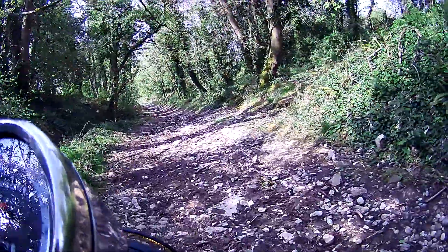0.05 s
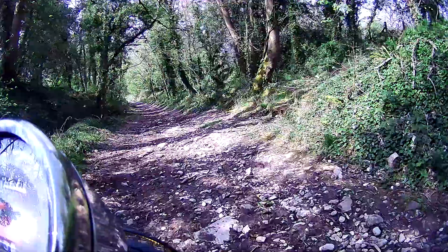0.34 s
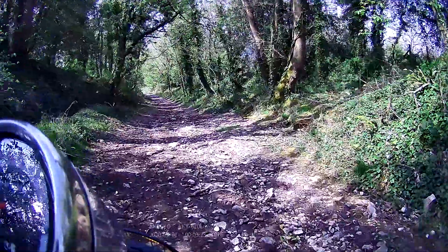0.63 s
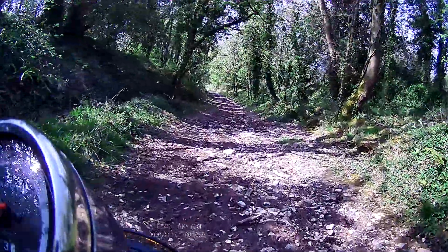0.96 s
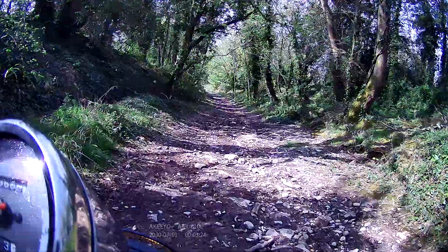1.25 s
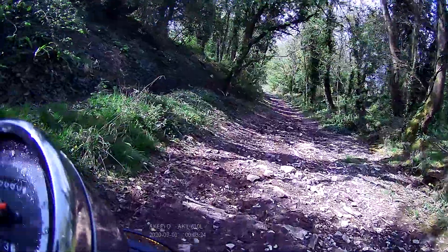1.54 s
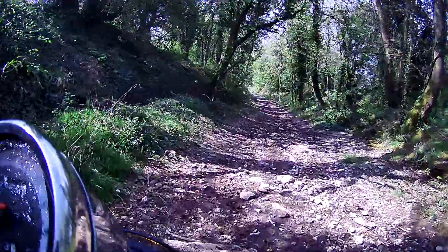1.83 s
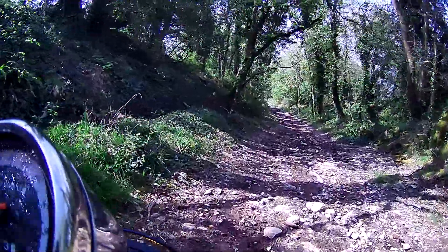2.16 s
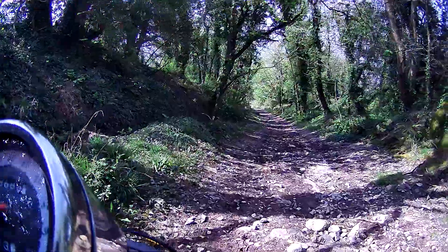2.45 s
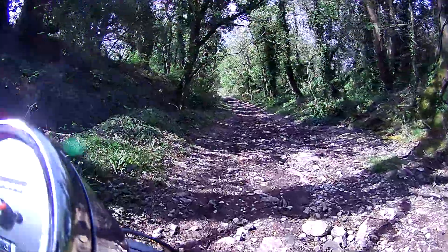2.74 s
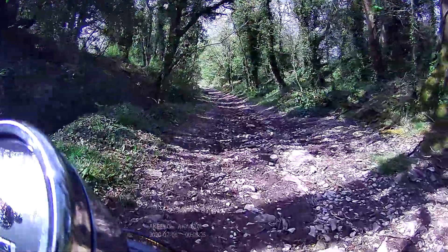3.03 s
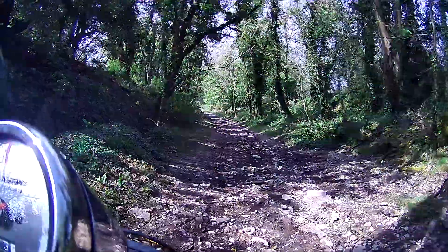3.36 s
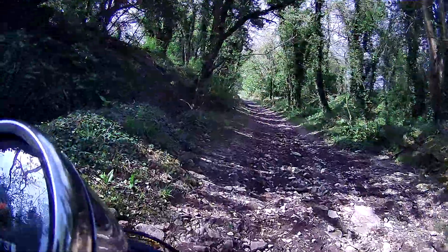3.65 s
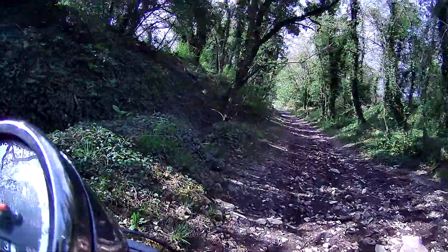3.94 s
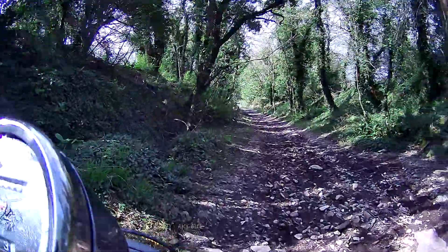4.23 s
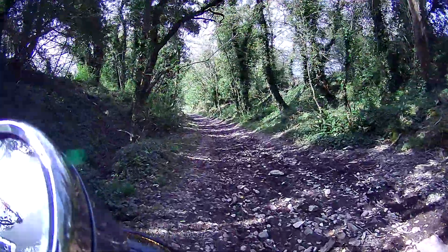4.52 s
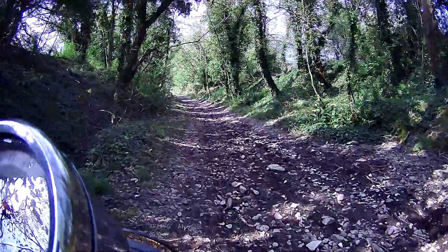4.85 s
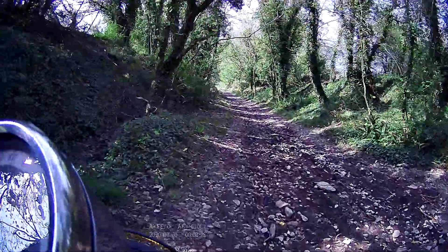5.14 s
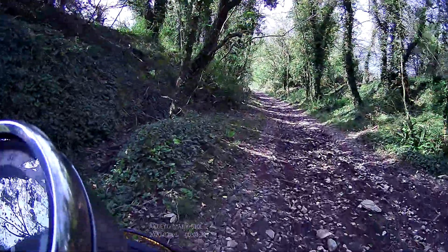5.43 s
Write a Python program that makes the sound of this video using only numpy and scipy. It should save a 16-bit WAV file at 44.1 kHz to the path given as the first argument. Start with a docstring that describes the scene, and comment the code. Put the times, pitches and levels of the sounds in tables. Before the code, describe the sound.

A single-cylinder motorcycle plods along a stony lane, heard close from the handlebars for nearly six seconds. Throughout, the exhaust thumps at low revs, with engine knocks, ticking valves and a mechanical whirr. Gravel crunches, stones snap brightly under the tyres, and hard knocks and loose metal clank irregularly.

The revs dip just after the start, then climb unevenly through six throttle pulls, at about 0.8, 1.5, 2.4, 3.2, 4.2 and 5.5 seconds. Each adds a rough, honking intake drone for roughly half a second or a little more, and the later ones are louder. Rocky ground around 2.9 seconds brings a cluster of stone cracks and clanks; a rougher patch around 3.7 seconds adds thicker clicks and a low rumble. The hardest clank lands with a sharp stone snap at 4.7 seconds. The loudest peaks briefly overload the microphone.

```python
"""A stony lane, from a camera microphone on the handlebars of a plodding single-cylinder motorcycle.
From the start, close by, each cycle thumps the exhaust, knocks the engine and ticks the valves; stones
snap under the tyres, and hard engine knocks and loose metal clank. From 0.8 s six pulls of the throttle
set the intake honking and the low revs climb unevenly. Rocky ground passes at 2.9 s and 3.7 s; the
hardest clank comes at 4.7 s. The loudest peaks overload the microphone."""
import sys
import numpy as np
from scipy import signal
from scipy.fft import rfft, irfft, next_fast_len
from scipy.io import wavfile
from scipy.ndimage import map_coordinates

SR = 44100
rng = np.random.default_rng(int(sys.argv[2]) if len(sys.argv) > 2 else 0)


def bounce(signal):
    """Save signal as a 16-bit WAV file at the path given by the first command-line argument."""
    frames = np.transpose(np.atleast_2d(signal))
    limited = np.clip(frames, -1, 1)
    pcm = np.round(limited * 32767).astype(np.int16)
    wavfile.write(sys.argv[1], SR, pcm)


N = 250929
TIME = np.arange(N) / SR

# blows within one engine cycle: (position [cycles], relative thud [dB], relative tick [dB])
CYCLE_BLOWS = [(.05, 1.5, -4), (.15, 0.5, -4.5), (.28, 1.5, -9.5), (0.381, -5, -2.5), (0.457, -27.5, -5),
               (0.588, 0, -1), (.715, 7, -29), (.83, -2, -25.5)]
# spectrum of crunching grit: (frequency [Hz], level [dB])
GRIT_SPECTRUM = [(1200, -11.5), (1800, -7.5), (2600, 5), (3100, 14.5), (3650, -15.5), (4300, 7),
                 (4750, -12), (5100, 3), (5700, -18), (6400, 0.5), (7200, -18), (8000, -21), (9000, -32)]
# resonance of struck metal: (frequency [Hz], width [Hz], gain [dB])
CLANK_MODE = [(1365, 150, 0)]


def amp(db):
    """Decibels to gain."""
    return 10 ** (np.asarray(db) / 20)


def unit(x):
    """Scale to rms 1."""
    return x / np.sqrt(np.mean(x ** 2) + 1e-20)


def bell(x, width):
    """A smooth hump of height 1 around x = 0."""
    return np.exp(-.5 * (x / width) ** 2)


def wobble(rate):
    """A smooth random curve, rate knots a second."""
    return map_coordinates(rng.standard_normal(int(N * rate / SR) + 4), [TIME * rate])


def filtered(x, response):
    """x times a complex response of frequency."""
    m = next_fast_len(N + SR // 2)
    return irfft(rfft(x, m) * response(np.fft.rfftfreq(m, 1 / SR)), m)[:N]


def coloured(x, points):
    """x through a spectrum of (frequency [Hz], level [dB]) points, at rms 1."""
    hz, db = np.transpose(points)
    return unit(filtered(x, lambda f: amp(np.interp(np.log(f + 1), np.log(hz), db))))


def ring(x, modes):
    """x through the resonances of a body."""
    return filtered(x, lambda f: sum(amp(db) * 1j * f * width / (hz * hz - f * f + 1j * f * width)
                                     for hz, width, db in modes))


def blows(cycles, position, scatter_db, jitter_s):
    """One impulse per engine cycle at the given position in it, uneven in size and time."""
    due = np.arange(-1, int(cycles[-1]) + 2) + position
    lateness, size = rng.standard_normal((len(due), 2)).T
    times = np.interp(due, cycles, TIME, -1, -1) + jitter_s * lateness
    at = np.round(times * SR).astype(int)
    heard = (at >= 0) & (at < N)
    return np.bincount(at[heard], amp(scatter_db * size[heard]), N)


def bursts(hits, t60_s):
    """Each impulse becomes a dying burst of noise."""
    return signal.lfilter([1], [1, -amp(-60 / (t60_s * SR))], hits) * rng.standard_normal(N)


def lane(load, roughness):
    """Fine gravel crunches under the tyres, more under load; rocky ground rumbles at the microphone."""
    # ground rumble: (frequency [Hz], level [dB])
    rumble_spectrum = [(8, -0.5), (22, 8.5), (40, -6.5), (80, -8), (200, -8), (400, -15), (900, -57.5)]
    grains_per_s = 300
    grains = (rng.random(N) < grains_per_s / SR) * amp(2.5 * rng.exponential(size=N).clip(0, 3))
    crunch = unit(bursts(grains, t60_s=.02)) + rng.standard_normal(N)
    gravel = (amp(-53.5) + amp(-24.5) * load) * coloured(crunch, GRIT_SPECTRUM)
    rumble = coloured(rng.standard_normal(N), rumble_spectrum)
    return gravel + amp(-28.5 + 7.5 * roughness + 1.3 * wobble(4.3)) * rumble


def stones(roughness):
    """Stones snap brightly under the tyres; pebbles come thicker and harder on rocky ground."""
    # the larger stones: (time [s], relative level [dB], pitch [Hz])
    large_stones = [(.1565, -13.5, 6860), (.1808, -20, 2480), (.2822, -7, 3700), (.7248, -19.5, 5500),
                    (.837, -6.5, 3280), (.8945, -11.5, 2000), (1.0152, -12.5, 5150), (1.291, -11.5, 6200),
                    (1.6169, -9, 4030), (2.0526, -15.5, 3450), (2.188, -19.5, 5030), (2.3535, -7, 6140),
                    (2.812, -5.5, 3190), (2.827, -1, 2500), (2.8664, -1.5, 2600), (2.9626, -8, 5960),
                    (2.977, -4, 4000), (3.19, -14.5, 3320), (3.481, -4.5, 2500), (3.504, -11, 4900),
                    (3.5339, -6, 3200), (3.6514, -6, 3000), (3.685, -8, 3000), (3.7513, -4, 2700),
                    (3.761, -10.5, 4370), (3.7666, 3.5, 4370), (4.097, -21.5, 4500), (4.7019, 4, 2200),
                    (4.7808, -16, 3940), (4.9561, -3.5, 3000), (5.6642, -9, 5000)]
    pebbles_per_s = 6.4 + 35 * roughness
    at = np.flatnonzero(rng.random(N) < pebbles_per_s / SR)
    size, pitch = rng.standard_normal((len(at), 2)).T
    pebbles = zip(at / SR, -28.5 + 10 * roughness[at] + 2 * size, 4200 * np.exp(.3 * pitch))
    t = np.arange(SR // 16) / SR
    f = np.fft.rfftfreq(len(t), 1 / SR)
    rise_s, t60_s = .0014, .019
    snap = amp(5 - 60 * t / t60_s) * (1 - np.exp(-(t / rise_s) ** 2))
    band = f ** 2 / (f ** 2 + 1300 ** 2) / (1 + (f / 9000) ** 8)
    peak = lambda hz, width_hz: 1 / (1 + ((f - hz) / width_hz) ** 2)
    clicks = np.zeros(N + SR)
    for start_s, db, hz in [*large_stones, *pebbles]:
        colour = (.96 + peak(hz, 600) + .25 * peak(5500, 390)) * band
        grit = unit(irfft(rfft(rng.standard_normal(len(t))) * colour, len(t)))
        clicks[round(start_s * SR):][:len(t)] += amp(db) * snap * grit
    return clicks[:N]


def metal_clanks():
    """Struck metal: a ring that takes a few periods to build, under a short bright clatter."""
    # hard engine knocks, mostly at low revs, and loose metal jolted by bumps:
    # (time [s], relative level [dB])
    clanks = [(0.0456, -11.5), (0.1806, -3), (0.2829, -2), (0.381, -6.5), (0.685, -7.5), (0.8968, -6),
              (1.445, -8.5), (1.52, -4.5), (1.6189, -8), (2.0526, -11), (2.827, -1.5), (2.866, -0.5),
              (2.996, -4.5), (3.165, -8), (3.481, 2.5), (3.5738, -6), (3.7229, -3), (4.7017, 6),
              (4.9569, -4), (5.438, -5.5)]
    times, db = np.transpose(clanks)
    hits = np.bincount(np.round(times * SR).astype(int), amp(db), N)
    ringing = ring(ring(hits, CLANK_MODE), CLANK_MODE)
    clatter = ring(bursts(hits, t60_s=.061), [(2160, 880, 13)])
    return amp(1.5 + db.max()) * ringing / np.abs(ringing).max() + amp(-14.5) * clatter


def valves(cycles):
    """Tappets tick at set points of the cycle; the running chain keeps the same metal ringing."""
    # valve gear resonances: (frequency [Hz], width [Hz], gain [dB])
    valve_modes = [(3170, 260, -1.5), (3047, 260, 7), (4400, 110, -12.5), (5160, 260, -7.5),
                   (6360, 580, 1.5)]
    spectrum = [(1500, -16.5), (2800, 6.5), (3300, 9), (3650, -8), (4200, 11.5), (6600, -8), (8000, -15)]
    taps = sum(amp(tick_db) * blows(cycles, position, scatter_db=1.5, jitter_s=.0003)
               for position, _, tick_db in CYCLE_BLOWS)
    chain = .53 * rng.standard_normal(N)
    ticks = unit(bursts(taps, t60_s=.017))
    return amp(-33) * coloured(ring(ticks + chain, valve_modes), spectrum)


def knock(cycles, load):
    """Combustion strikes and rattles the engine metal once a cycle; it sings faintly in between."""
    # engine metal resonances: (frequency [Hz], width [Hz], gain [dB])
    engine_modes = [(1337, 91, 11), (1290, 170, -8.5), (1750, 230, -23.5), (2470, 530, -17)]
    spectrum = [(900, -11), (1200, -5.5), (1290, 2), (1450, 3.5), (1600, -15), (2000, -3), (4000, -10)]
    hits = blows(cycles, .735, scatter_db=1.5, jitter_s=.0008)
    strike = unit(ring(ring(hits, CLANK_MODE), CLANK_MODE))
    swell = bell((cycles - .765 + .5) % 1 - .5, .048)  # peaks just after the strike
    rattle = swell * rng.standard_normal(N)
    singing = amp(-12) * rng.standard_normal(N)
    metal = coloured(ring(rattle + singing, engine_modes), spectrum)
    rasp = coloured(rattle, GRIT_SPECTRUM)
    level_db = -20.5 - 1.5 * load / load.max()  # eases under load
    return amp(level_db) * (.25 * strike + 1.017 * metal + amp(-20.5) * rasp)


def exhaust(cycles, revving):
    """Each firing is a soft push-pull of air, stronger at higher revs; the pipe adds a duller echo."""
    # exhaust pipe colour: (frequency [Hz], level [dB])
    pipe_spectrum = [(35, -5), (66, 2), (95, 1.5), (125, -2), (152, 6.5), (185, -11), (260, -13)]
    echo_s, low_cut_hz = .0165, 42
    firings = blows(cycles, .035, scatter_db=1, jitter_s=.0003)
    puff = lambda f, hz: -1j * f / hz * bell(f, hz)
    echo = lambda f: .78 * puff(f, hz=44) * np.exp(-2j * np.pi * f * echo_s)
    low_cut = lambda f: f ** 4 / (f ** 4 + low_cut_hz ** 4)
    thumps = filtered(firings, lambda f: (puff(f, hz=77) + echo(f)) * low_cut(f))
    return amp(-24.5 + .34 * revving) * coloured(thumps, pipe_spectrum)


def mount_shake(cycles, revving):
    """The engine's blows thud through the mount to the microphone, over the whirr of moving parts."""
    # camera mount resonances: (frequency [Hz], width [Hz], gain [dB])
    mount_modes = [(474, 23, 3), (516, 81, -5.5), (669, 66, -10), (1034, 82, -24.5)]
    # moving engine parts: (frequency [Hz], level [dB])
    whirr_spectrum = [(150, -19), (220, -16.5), (330, -7.5), (420, -5), (600, 6.5), (780, -1), (920, -6),
                      (1100, -7), (1220, -22), (1600, -30), (2500, -37), (4000, -40.5)]
    hits = sum(amp(thud_db) * blows(cycles, position, scatter_db=2, jitter_s=.00022)
               for position, thud_db, _ in CYCLE_BLOWS)
    softened = filtered(hits, lambda f: 1 / (1 + (f / 1150) ** 8) / (1 + (300 / (f + 1)) ** 4))
    thuds = unit(ring(softened, mount_modes))
    whirr = coloured(rng.standard_normal(N), whirr_spectrum) * amp(2.32 * wobble(70))
    return amp(.55 * revving) * (amp(-17.5) * thuds + amp(-15) * whirr)


def throttle():
    """Load (as the drone's gain) and its note: each pull starts as a low groan, swells, holds and dies."""
    # throttle pulls: (opens [s], closes [s], drone level [dB], pitch at cruising speed [Hz])
    pulls = [(0.848, 1.422, -15.5, 497), (1.545, 2.301, -21.5, 518), (2.37, 2.998, -12.3, 546),
             (3.238, 3.998, -8.8, 552), (4.219, 4.731, -9, 550.9), (5.548, 5.9, -7.5, 553.5)]
    swell_s, fade_s = .018, .022
    groan_lead_s, groan_width_s, groan_hz = .0702, .04, 465.2
    coast_db, coast_hz = -22, 504.4  # throttle shut
    parts = [(np.full(N, amp(coast_db)), coast_hz)]
    for opens, closes, db, hz in pulls:
        opening = (1 + np.tanh((TIME - opens) / (2 * swell_s))) / 2
        closing = (1 + np.tanh((closes - TIME) / (2 * fade_s))) / 2
        groan = bell(TIME - opens + groan_lead_s, groan_width_s)
        parts += [(amp(db) * opening * closing, hz), (amp(db - 9) * groan, groan_hz)]
    load = sum(gain for gain, _ in parts)
    note_hz = sum(gain ** 2 * hz for gain, hz in parts) / sum(gain ** 2 for gain, _ in parts)
    return load, note_hz


def intake_drone(cycles, revving, load, note_hz):
    """A rough honk that swells and rises as the throttle opens; each firing tugs its level and phase."""
    pitch_hz = note_hz + 9 * revving
    phase = 2 * np.pi * np.cumsum(pitch_hz) / SR
    waver = wobble(120) + 1j * wobble(120)
    sag = 1 - .5 * bell((cycles - .63 + .5) % 1 - .5, .06)
    tug = .6 * np.sin(2 * np.pi * cycles) + .35 * np.sin(4 * np.pi * cycles)
    jitter = .3 * wobble(60) + .31 * wobble(300)
    tone = np.real((1 + .64 * waver) * np.exp(1j * (phase + tug + jitter)))
    return load * unit(sag * tone)


def scene():
    """At the handlebars, in mono: the engine follows revs and throttle, the tyres follow the ground."""
    # engine speed: (time [s], firing rate [Hz])
    engine_speed = [(0, 13.53), (.26, 11.47), (.8, 14.2), (1.19, 15.14), (1.48, 13.6), (1.68, 14.75),
                    (2.21, 15.34), (2.5, 17.04), (2.76, 16.82), (3.11, 15.71), (3.4, 17.8), (3.88, 17.45),
                    (4.17, 16.08), (4.38, 18.08), (4.8, 16.32), (5.34, 16.24), (5.69, 18.06)]
    # rocky stretches: (middle [s], half length [s], roughness [relative])
    rocky_stretches = [(2.896, 0.16, 0.3), (3.666, 0.11, 1.1)]
    firing_hz = np.interp(TIME, *np.transpose(engine_speed))
    cycles = .122 + np.cumsum(firing_hz) / SR
    revving = firing_hz - 16  # firings a second above cruising speed
    load, note_hz = throttle()
    roughness = sum(height * bell(TIME - middle, half) for middle, half, height in rocky_stretches)
    engine = mount_shake(cycles, revving) + intake_drone(cycles, revving, load, note_hz)
    engine += exhaust(cycles, revving) + knock(cycles, load) + valves(cycles)
    return (lane(load, roughness) + metal_clanks() + stones(roughness) + engine)[None]


def record(dry):
    """The microphone overloads and is dulled; sharp peaks clip again before the camera's band limit."""
    ceiling, hardness, band_limit_hz = .57, 9, 15800
    overloaded = dry[0] / (1 + np.abs(dry[0] / ceiling) ** hardness) ** (1 / hardness)
    treble_loss = lambda f: 1 / np.sqrt(1 + (f / 7000) ** 24) / (1 + (f / 8500) ** 50)
    clipped = filtered(overloaded, treble_loss).clip(-.68, .68)
    return filtered(clipped, lambda f: f < band_limit_hz)[None]


dry = scene()
out = record(dry)
bounce(out)
```